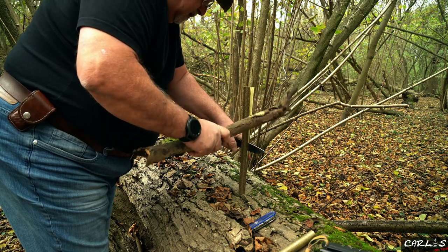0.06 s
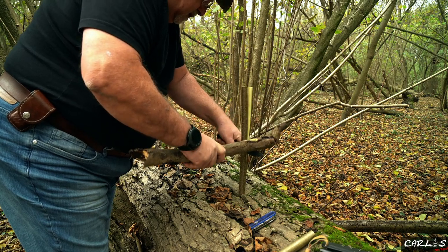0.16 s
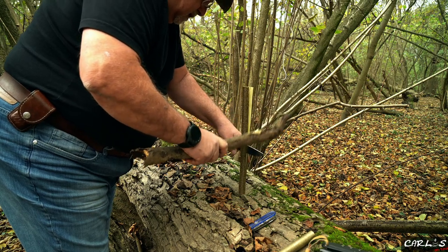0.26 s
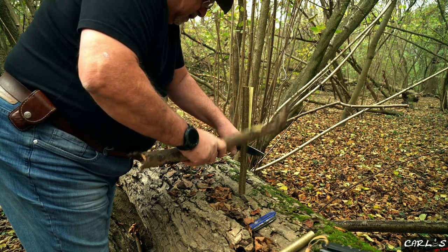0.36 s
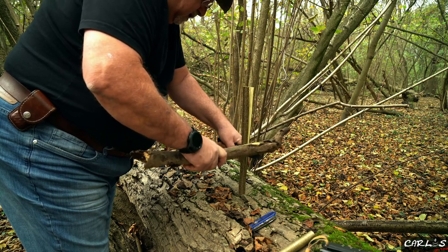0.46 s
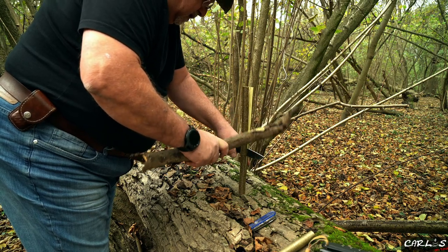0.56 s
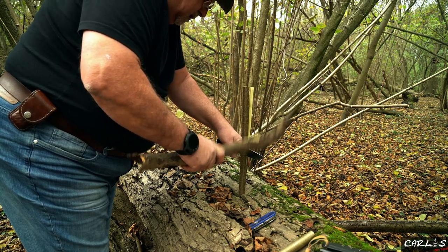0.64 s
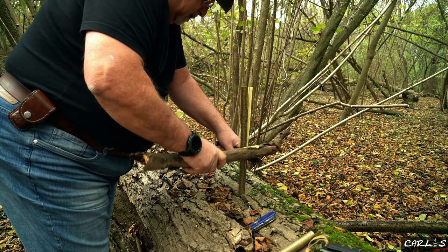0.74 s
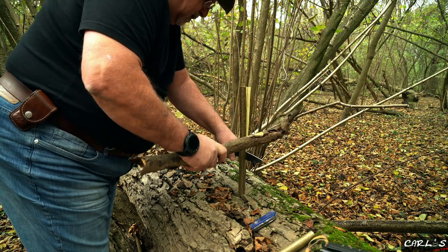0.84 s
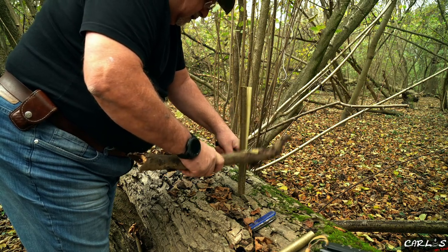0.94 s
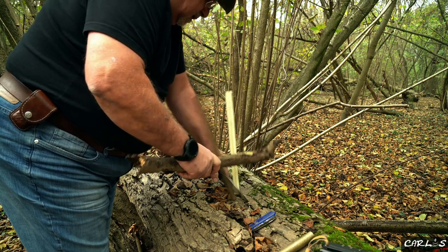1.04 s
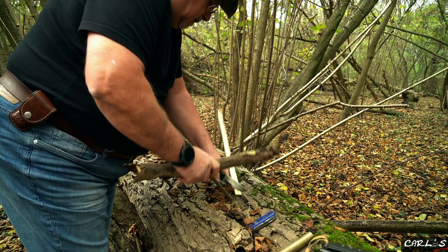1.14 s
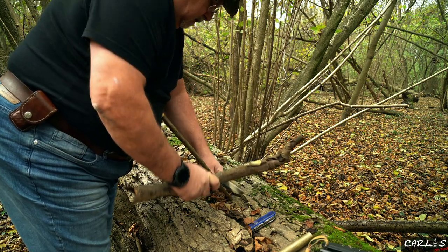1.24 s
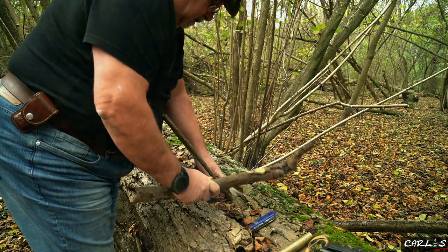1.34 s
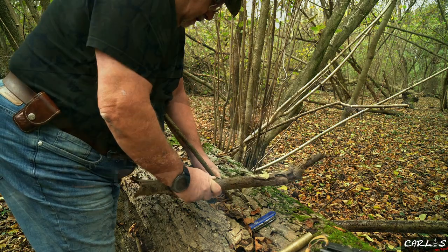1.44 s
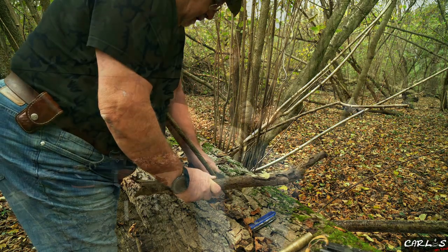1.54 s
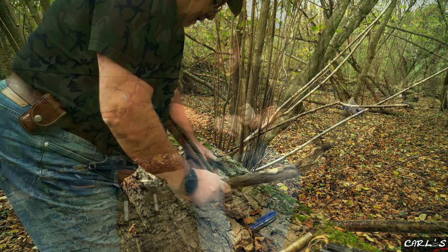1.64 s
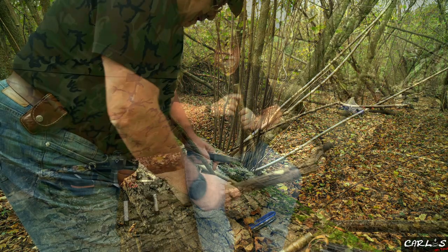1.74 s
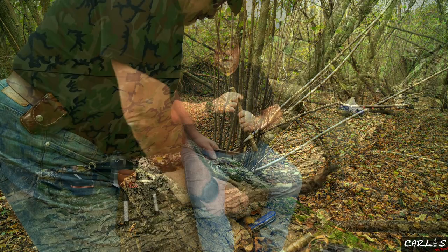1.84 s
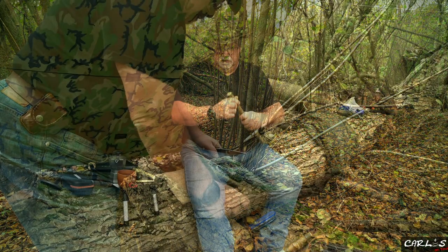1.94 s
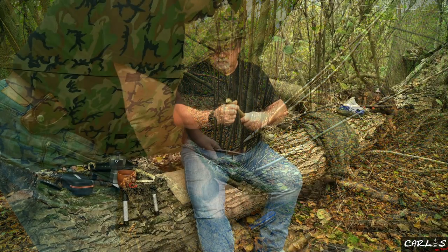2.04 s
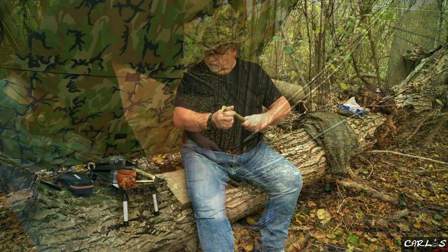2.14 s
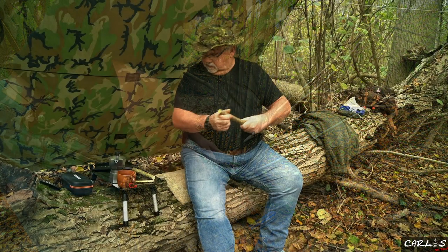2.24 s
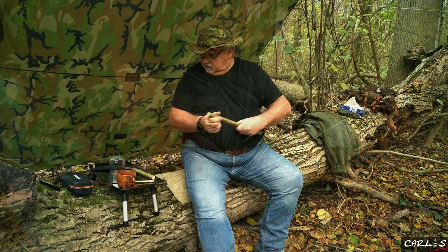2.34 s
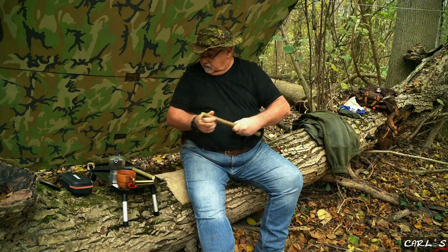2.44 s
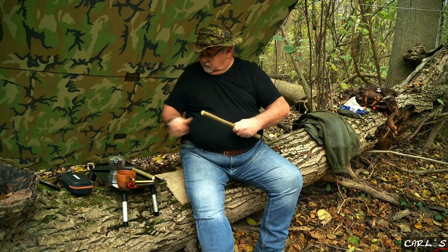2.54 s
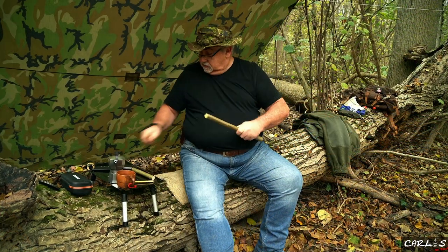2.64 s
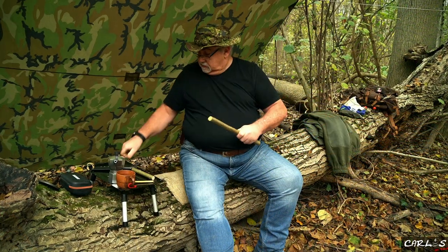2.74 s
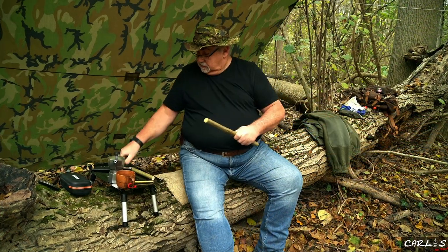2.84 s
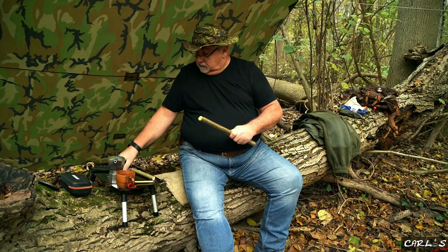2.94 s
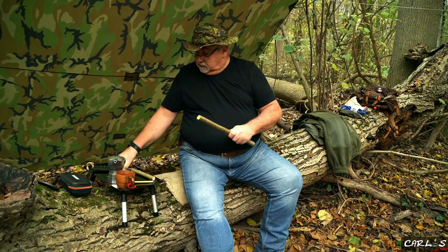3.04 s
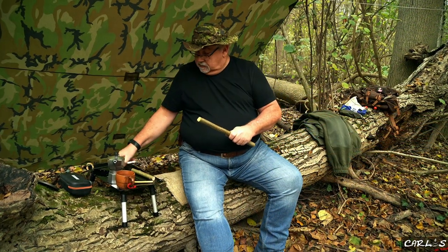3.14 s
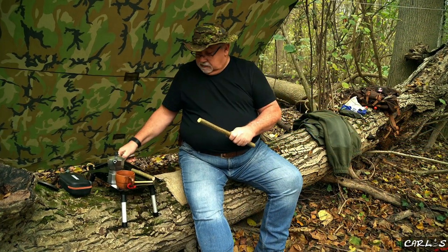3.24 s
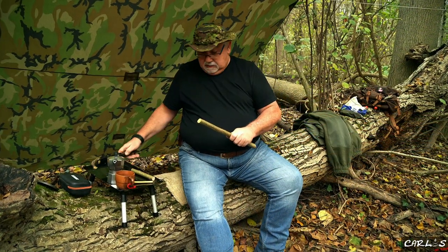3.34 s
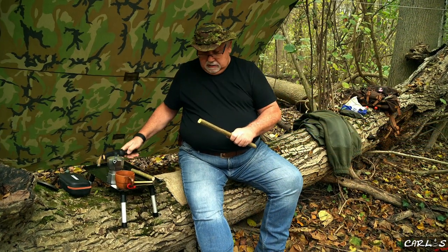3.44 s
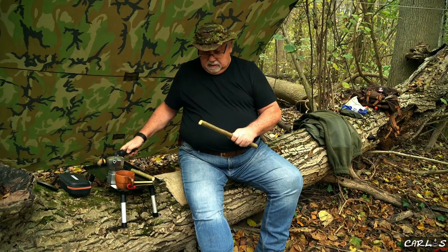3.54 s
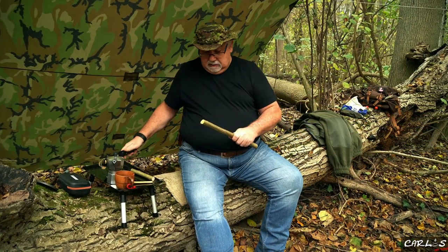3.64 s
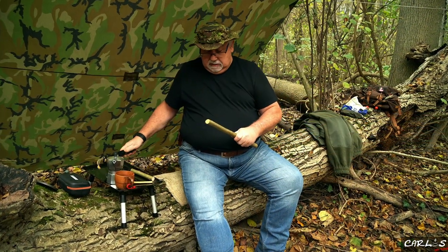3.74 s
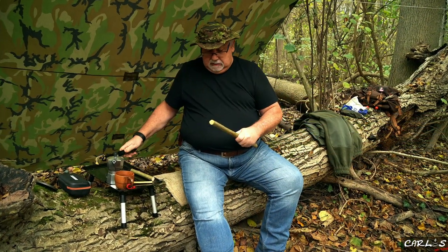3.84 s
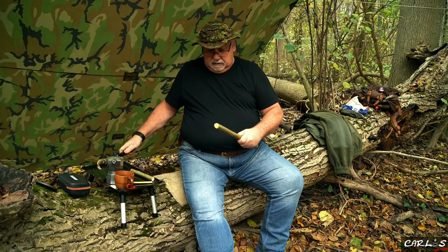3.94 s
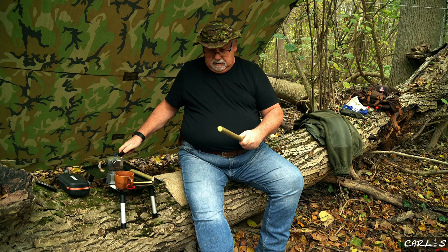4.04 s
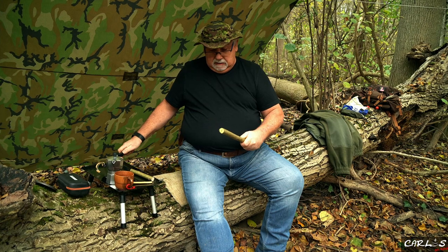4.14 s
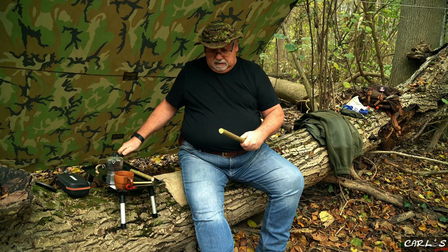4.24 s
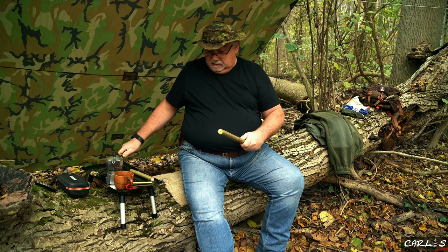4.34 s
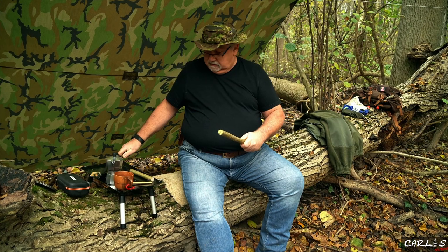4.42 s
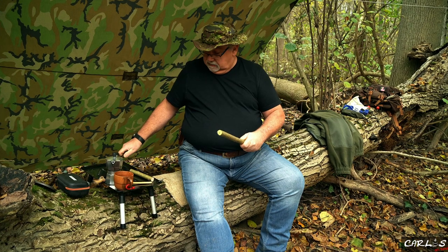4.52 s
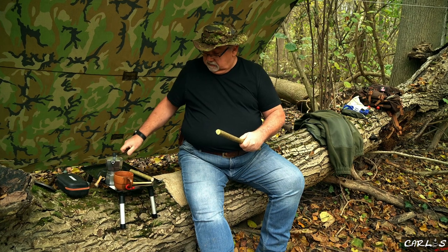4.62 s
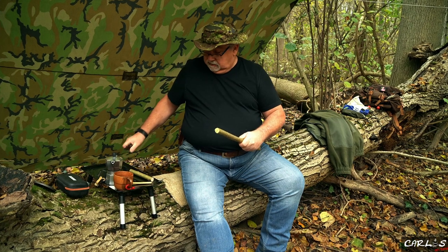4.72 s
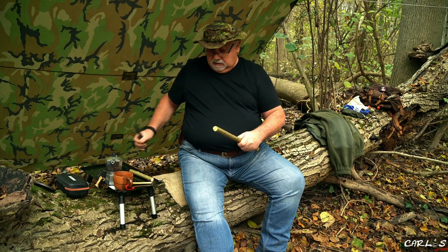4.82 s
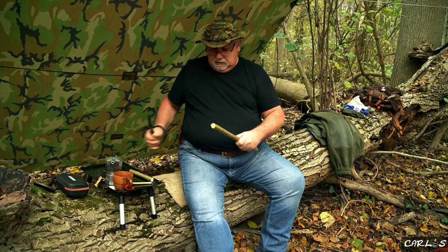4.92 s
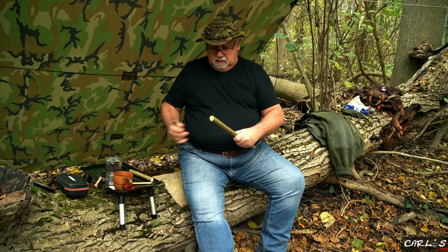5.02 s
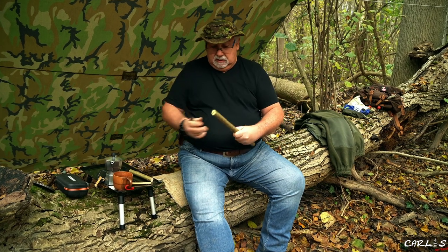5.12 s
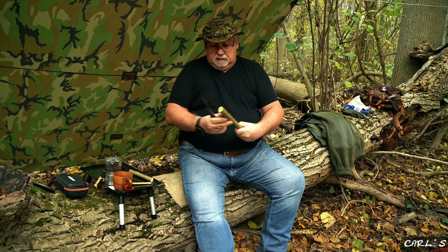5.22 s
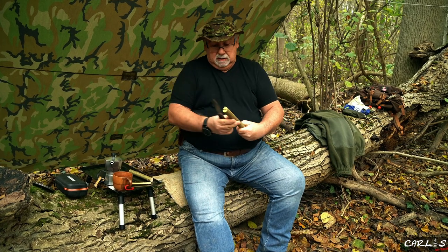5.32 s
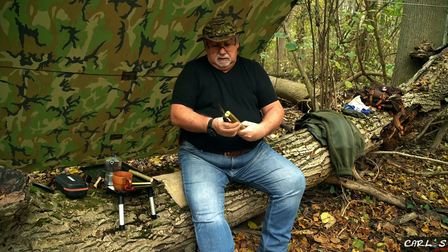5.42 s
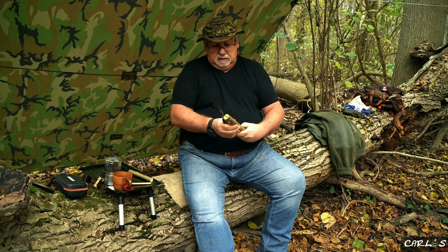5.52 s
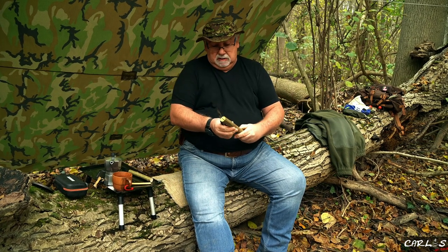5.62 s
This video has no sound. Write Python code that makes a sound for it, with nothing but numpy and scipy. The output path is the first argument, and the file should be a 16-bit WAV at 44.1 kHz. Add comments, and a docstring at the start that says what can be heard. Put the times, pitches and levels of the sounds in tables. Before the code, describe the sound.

A stick hammers a blade through a pole until it tears apart; after a hush, small hard gear is handled and rattled outdoors.

```python
"""Splitting a thin pole with a blade

A stick hammers a blade down a pole in a quiet wood: dull air-swing knocks, then cracks of noisy slips.
Resonant groans tear it open; its halves ring on a log as sums of dying sines. Filtered grit makes hands
and cloth rustle and gear clatter on the log; ticks, a far bird and hushed air join in. Loud peaks clip."""
import sys
import numpy as np
from scipy import signal
from scipy.io import wavfile
from scipy.ndimage import uniform_filter1d

SR = 44100
rng = np.random.default_rng(int(sys.argv[2]) if len(sys.argv) > 2 else 0)


def gain_from_db(level_db):
    """Turn a decibel level (scalar or array-like) into a linear amplitude factor."""
    decades = np.asarray(level_db, float) / 20
    return 10 ** decades


def unload_wav(signal):
    """Save mono or channel-first audio to the path in sys.argv[1] as 16-bit WAV at rate SR, clipped to [-1, 1]."""
    wavfile.write(
        sys.argv[1],
        SR,
        np.round(np.clip(np.atleast_2d(signal).T, -1, 1) * 32767).astype(np.int16),
    )


N = 250039
LEAD = SR // 5  # samples ahead of 0 s, for a crack that starts there

# spectrum of snapping fibres and bark dust: hz, level_db
FIBRE_SPECTRUM = [(880, -52), (1500, -20), (2590, -10.5), (5120, -5.5), (5880, -10.5), (6830, -6.5),
                  (8660, -6), (10300, -14), (12600, -11), (16000, -10)]


def evened(x):
    """Scales to rms 1."""
    return x / np.sqrt(np.mean(x ** 2) + 1e-20)


def peaked(x):
    """Scales to peak 1."""
    return x / (abs(x).max() + 1e-20)


def read(points, hz):
    """Reads a spectrum on a log-frequency axis."""
    f, value = np.transpose(points)
    return np.interp(np.log(hz + 1), np.log(f + 1), value)


def blank():
    """Empty track with the lead."""
    return np.zeros(N + LEAD)


def seconds(count):
    """Time axis of count samples."""
    return np.arange(count) / SR


def add(mix, s, sound):
    """Mixes a sound in at s seconds."""
    part = mix[LEAD + round(s * SR):][:len(sound)]
    part += sound[:len(part)]


def colour(x, points, tilt_db=0., pivot_hz=3000, lifts=()):
    """Minimum-phase filter: spectrum, tilt per octave and resonance lifts (hz, width_hz, lift_db)."""
    hz = abs(np.fft.fftfreq(4096, 1 / SR))
    db = read(points, hz) + tilt_db * np.log2((hz + 50) / pivot_hz)
    db = db + sum(lift / (1 + (2 * (hz - f) / w) ** 2) for f, w, lift in lifts)
    log_gain = np.log(gain_from_db(np.maximum(db, -100)))
    impulse = np.fft.ifft(np.exp(np.conj(signal.hilbert(log_gain)))).real[:2048]
    return signal.oaconvolve(x, impulse)[:len(x)]


def resonances(x, bands):
    """Sum of resonant filters (hz, width_hz, level_db)."""
    return sum(gain_from_db(db) * signal.lfilter(*signal.iirpeak(hz, hz / w, SR), x) for hz, w, db in bands)


def modes(table, t):
    """Sum of dying sines (hz, level_db, t60_s)."""
    return sum(gain_from_db(db - 60 * t / t60) * np.sin(2 * np.pi * hz * t) for hz, db, t60 in table)


def grit(shape, spread_db):
    """Noise whose samples differ widely in size, as many small slips do."""
    return rng.standard_normal(shape) * gain_from_db(spread_db * np.minimum(rng.exponential(1, shape), 4))


def clumps(shape, depth_db, width):
    """Random gain that wanders over width samples."""
    return gain_from_db(depth_db * evened(uniform_filter1d(rng.standard_normal(shape), width)))


def burst(t, rise, hold, t60):
    """Rises, holds, then dies away."""
    fall = gain_from_db(-60 * np.maximum(t - rise - hold, 0) / max(t60, 1e-3))
    return np.minimum(t / max(rise, 1e-5), 1) * fall


def level(rows):
    """Gain along a level curve, -120 dB outside it."""
    s, db = np.transpose(rows)
    return gain_from_db(np.interp((np.arange(N + LEAD) - LEAD) / SR, s, db, left=-120, right=-120))


def strays(per_s):
    """Random moments at a mean rate, each with two numbers between -1 and 1."""
    rows = rng.random((60, 3))
    s = np.cumsum(-np.log(1 - rows[:, 0]) / per_s)
    return [(a, 2 * b - 1, 2 * c - 1) for a, (_, b, c) in zip(s, rows) if a < N / SR]


def air():
    """Far hush of the wood over a low rumble lifted by a far drone, drifting in patches."""
    # hush spectrum: hz, level_db
    hush = [(12, -32), (20, -5), (74, -3), (177, -16.5), (319, -14.5), (388, -18), (976, -18.5),
            (2080, -25.5), (7520, -33.5), (13900, -45), (16000, -44)]
    level_db = -48.5
    drone_hz, drone_width_hz, drone_lift_db = 53, 17, 3
    frames, hz = N // 1024 + 5, np.fft.rfftfreq(4096, 1 / SR)
    real, imaginary, patches = rng.standard_normal((frames, 2049, 3)).T
    patches = evened(uniform_filter1d(uniform_filter1d(patches, 40, 0), 8, 1))
    hush_db = read(hush, hz) + drone_lift_db / (1 + (2 * (hz - drone_hz) / drone_width_hz) ** 2)
    z = (real + 1j * imaginary) * gain_from_db(hush_db[:, None] + 0.43 * patches)
    return gain_from_db(level_db) * evened(signal.istft(z, nperseg=4096, noverlap=3072)[1][:N])


def cracks():
    """Each snap is a spray of slips; the trees scatter hiss back and the gripped blade rings a little."""
    # snapping fibres: start_s, level_db, hold_s, tilt_db_per_octave
    snaps = [(-.085, -1, 0.0033, 1.5), (0.1816, -0.5, 0.0051, -0.5), (0.445, 2.5, 0.0045, 0.5),
             (0.7117, 2.5, 0.0044, 1), (.969, 3.5, 0.0039, 5), (1.016, -15.5, 0.016, 0),
             (1.0297, -5.5, 0.0032, -2), (1.0563, -17, 0.0052, 0), (1.109, -25.5, 0.0023, -2),
             (1.151, -28, 0.0021, 5.5), (1.162, -28, 0.011, -3.5), (1.338, -22, 0.014, -7)]
    # two fuzzy blade rings, one row per depth in the wood: low_hz, high_hz
    blade_hz = [(5100, 7700), (7000, 8500), (6600, 7400)]
    # moments after which the blade sits deeper: s
    deeper_s = [.4, .65]
    blade_db, blade_t60_s, blade_filter_width_hz = -43, .5, 950
    flash_db, flash_t60_s, flash_band = -10, 0.00852, (14900, 2100, 0)
    trees_db, trees_tilt_db, trees_t60_s = -28.5, 0, .26
    top_hz, top_t60_s = 9200, .14  # leaves swallow the top treble sooner
    mix, t = blank(), seconds(SR // 2)
    shape = len(snaps), len(t)
    sprays, tails = grit(shape, 1.2), grit(shape, 2.)
    tails = tails * clumps(shape, 1.5, 150)  # trunks stand unevenly
    for (s, db, hold, tilt_db), spray, tail in zip(snaps, sprays, tails):
        ring_hz = blade_hz[np.searchsorted(deeper_s, s)]
        bands = [(hz, blade_filter_width_hz, 0) for hz in ring_hz]
        lifts = [(hz, .5 * blade_filter_width_hz, 6.5) for hz in ring_hz]
        t60 = 0.0036 * gain_from_db(-1.1 * db)  # weak snaps die more slowly
        snap = peaked(colour(spray * burst(t, .0001, hold, t60), FIBRE_SPECTRUM, tilt_db, 6000, lifts))
        # very bright first instant
        flash = peaked(resonances(spray * burst(t, .0001, 0.00036, flash_t60_s), [flash_band]))
        hiss = evened(colour(tail, FIBRE_SPECTRUM, trees_tilt_db, 6000, lifts))
        top = signal.lfilter(*signal.butter(3, top_hz, "high", fs=SR), hiss)
        scatter = (hiss - top) * burst(t, 0.0024, 0.001, trees_t60_s)
        scatter = scatter + top * burst(t, 0.0021, .0007, top_t60_s)
        blade = evened(resonances(resonances(tail, bands), bands))
        blade = blade * burst(t, 0.0017, 0.0016, blade_t60_s)
        sound = snap + gain_from_db(flash_db + tilt_db) * flash
        sound = sound + gain_from_db(trees_db) * scatter + gain_from_db(blade_db) * blade
        add(mix, s, gain_from_db(db) * sound)
    return mix


def bird():
    """Far, short whistles that arch up and down, with an octave partial."""
    # chirps: start_s, length_s, level_db, top_hz of the lower partial
    chirps = [(.121, .03, -60, 2480), (.643, .027, -64, 2480)]
    arch_share, octave_db = .22, 1.5  # share by which the ends are lower; upper partial
    mix = blank()
    for s, length, db, hz in chirps:
        arch = np.sin(np.pi * np.arange(0, length, 1 / SR) / length)
        phase = 2 * np.pi * np.cumsum(hz * (1 - arch_share * (1 - arch))) / SR
        whistle = np.sin(phase) + gain_from_db(octave_db) * np.sin(2 * phase)
        add(mix, s, gain_from_db(db) * evened(np.sqrt(arch) * whistle))
    return mix


def ticks():
    """Tiny dry ticks: a noise click excites one brief, broad resonance."""
    # placed ticks: start_s, peak_db, ring_hz
    placed = [(.1445, -37, 8960), (1.775, -42.5, 12030), (2.365, -40, 13500), (1.985, -36, 6200),
              (2.112, -21, 7700), (2.463, -21.5, 7640), (2.475, -24, 7500), (4.013, -39.5, 7900)]
    stray_per_s, stray_db, stray_hz = 0.5, -58, 10200  # mean values
    mix, t = blank(), seconds(600)
    clicks = placed + [(s, stray_db + 5 * a, stray_hz * (1 + 0.31 * b)) for s, a, b in strays(stray_per_s)]
    for (s, db, hz), puff in zip(clicks, rng.standard_normal((80, len(t)))):
        ring = resonances(puff * burst(t, .0002, .0008, .012), [(hz, .3 * hz, 0)])
        add(mix, s, gain_from_db(db) * peaked(ring))
    return mix


def knocks():
    """A soft contact gives one and a half swings of air; the log rings low and the ground echoes."""
    # knocks of wood on wood: start_s, level_db, pitch_hz
    blows = [(0.1702, 0, 950), (0.435, 2.5, 1022), (0.7004, 1.5, 996), (0.9574, -1.5, 920),
             (1.059, -21, 540), (1.072, -23.5, 445), (1.1066, -13.5, 676), (1.1471, -14.5, 1060),
             (1.2, -32.5, 450), (1.2537, 3.5, 1150), (1.368, -8, 840)]
    # log modes before random detuning: hz, level_db, t60_s
    log_modes = [(410, 9, 0.025), (716, 1, 0.064), (1070, 2, 0.031), (257, -13.5, 0.22)]
    puff_db, echo_s, echo_db = -12, .0034, -22
    ring_s, ring_db, ring_db_per_db = 0.0013, -9, 0.5  # the ring grows more slowly than the knock
    mix, t = blank(), seconds(3000)
    detunings = rng.uniform(.9, 1.1, (len(blows), len(log_modes)))  # no two blows land alike
    for (s, db, hz), dust, detuning in zip(blows, grit((len(blows), len(t)), 2.), detunings):
        turns = hz * t
        swing = peaked(np.exp(-((turns - 1.07) / .6) ** 2) * np.sin(2 * np.pi * turns))
        # bark dust hisses with the blow
        puff = peaked(colour(dust * burst(t, 0.00028, 0.0046, 0.011), FIBRE_SPECTRUM, -12.0, 6000))
        detuned = [(f * k, lift, t60) for (f, lift, t60), k in zip(log_modes, detuning)]
        add(mix, s, gain_from_db(db) * (swing + gain_from_db(puff_db) * puff))
        add(mix, s + echo_s, gain_from_db(db + echo_db) * swing)
        add(mix, s + ring_s, gain_from_db(ring_db + ring_db_per_db * db) * peaked(modes(detuned, t)))
    return signal.lfilter(*signal.butter(1, 220, "high", fs=SR), mix)  # thin wood sends out little bass


def rustle():
    """Hands, cloth and leaves brush: fine grit in clumps, swelling and fading with each movement."""
    # strokes: start_s, end_s, level_db
    placed = [(1.379, 1.455, -40.5), (1.426, 1.523, -46), (1.491, 1.58, -41.5), (1.874, 1.993, -46),
              (2.012, 2.123, -47), (2.077, 2.179, -40), (2.226, 2.356, -45.5), (2.455, 2.51, -51),
              (3.43, 3.48, -56), (3.8, 3.835, -55.5), (4.82, 4.9, -57), (5.24, 5.41, -52), (5.52, 5.6, -54),
              (5.62, 5.69, -50)]
    # brushing spectrum: hz, level_db
    brush = [(240, -12.5), (400, -22), (616, -50), (814, 0), (2180, 1), (8240, 3), (10200, -8), (11900, -2),
             (16000, -6)]
    fidgets_per_s, fidget_s, fidget_db = 3.5, 0.029, -60  # small shifts of cloth, mean values
    fidgets = [(s, s + fidget_s * (1 + .5 * a), fidget_db + 4 * b) for s, a, b in strays(fidgets_per_s)]
    mix, shape = blank(), (80, SR // 4)
    fine = grit(shape, 4.) * clumps(shape, 1.8, 300)
    for (start, end, db), slips in zip(placed + fidgets, fine):
        tilt_db = -0.5 - 0.04 * (db + 51)  # per octave; lighter strokes are thinner
        stroke = evened(colour(slips, brush, tilt_db, 6000))[:round((end - start) * SR)]
        add(mix, start, gain_from_db(db) * stroke * signal.windows.tukey(len(stroke), .75))
    return mix


def tear():
    """Clumped, uneven slips excite the split wood; narrow groans stop as the halves part and tumble."""
    # groan, then tumbling: time_s, level_db
    curve = [(.968, -29), (.974, -20), (.994, -21), (1.001, -16), (1.009, -30.5), (1.075, -33), (1.09, -51),
             (1.115, -36), (1.2, -53), (1.26, -37), (1.49, -57)]
    # split wood: hz, filter_width_hz, level_db, stifled_s
    groans = [(1286, 103, -4.5, 1.003), (1532, 108, -3.5, 1.001), (2452, 230, -8.5, 0.93),
              (3455, 130, -10, 1.045), (530, 1900, -2, 3.1)]
    slips = grit(N + LEAD, 2.4) * clumps(N + LEAD, 2.2, 150)
    t = (np.arange(N + LEAD) - LEAD) / SR
    body = blank()
    for hz, width_hz, db, end in groans:
        band = [(hz, width_hz, 0)]
        groan = evened(resonances(resonances(slips, band), band))
        body += gain_from_db(db) * groan * np.clip((end - t) / 0.0063, 0, 1)
    return level(curve) * body


def taps():
    """The contact point and hardness choose which modes of the loose half pole sound."""
    # taps: start_s, peak_db, centre_hz, spread_octaves
    contacts = [(1.0267, -15.5, 1700, 0.42), (1.057, -19, 3700, 0.52), (1.214, -33, 4300, 0.27),
                (1.231, -18, 2020, 0.77), (1.2542, -7.5, 1810, 1.425), (1.317, -20.5, 4020, 0.28),
                (1.3653, -15, 1316, 0.58)]
    # pole modes: hz, level_db, t60_s
    pole = [(296, 18.5, 0.5), (535, 20, 0.089), (835, 2, 0.32), (1364, -2.5, 0.3), (1700, 11.5, 0.068),
            (2410, -1, 0.14), (2730, 11.5, 0.1), (3407, 14, 0.058), (4700, 11, 0.02)]
    mix, t = blank(), seconds(SR // 2)
    for s, db, centre_hz, spread in contacts:
        table = [(hz, lift - 5.3 * (np.log2(hz / centre_hz) / spread) ** 2, t60) for hz, lift, t60 in pole]
        add(mix, s, gain_from_db(db) * peaked(modes(table, t)))
    return mix


def clatter():
    """Gritty contacts ring hollow gear, held anew each time; the treble dies sooner than the body."""
    # gear put down and dragged: start_s, level_db, hold_s, tilt_db_per_octave, struck_spot_hz
    hits = [(2.9466, -22, 0.021, -6, 600), (2.987, -24, 0.01, -4, 503), (3.0264, -12, 0.012, -4, 1300),
            (3.106, -11.5, 0.00093, 2, 1330), (3.153, -33, 0.0067, 0, 2320), (3.206, -22, 0.00087, 4, 3330),
            (4.263, -33.5, 0.0041, 2, 1070), (4.303, -22.5, 0.0054, 1, 1070),
            (4.3125, -9.5, 0.0021, 2, 1010), (4.348, -20.5, 0.012, -0.5, 910),
            (4.365, -1.5, 0.0055, 2, 3600), (4.385, -9, .002, 3, 3660), (4.39, 0, 0.0042, 0, 1290),
            (4.4583, -7, 0.011, 0.5, 1190), (4.4916, -5.5, 0.0053, -1, 4760), (4.51, -1, 0.0069, 0.5, 2390),
            (4.5342, -2, 0.0036, 0, 4000), (4.5795, -12, 0.0086, -1, 1910), (4.588, -8, 0.013, -0.5, 800),
            (4.603, -8, 0.011, -1.5, 1960), (4.764, -23.5, 0.016, -4, 950)]
    # gear spectrum: hz, level_db
    gear = [(71, 6), (120, -21), (204, -9), (463, -9.5), (757, 3), (1650, -0.5), (4140, -2.5),
            (6110, -11.5), (7350, -5), (13600, -30.5), (16000, -31)]
    # gear resonances before random detuning: hz, width_hz, lift_db
    gear_modes = [(181, 44, 6.5), (680, 200, 1), (1037, 7.8, 5.5), (2310, 40, 8), (3500, 530, 1.5),
                  (7500, 410, -7.5), (12900, 1700, 16)]
    spot_q, spot_lift_db = 6., 6.5  # the struck place rings above the rest
    mix, t = blank(), seconds(SR // 5)
    shape = len(hits), len(t)
    contacts = grit(shape, 2.2) * clumps(shape, 1.8, 60)
    detunings = rng.uniform(.93, 1.07, (len(hits), len(gear_modes)))
    for (s, db, hold, tilt_db, spot_hz), slips, detuning in zip(hits, contacts, detunings):
        rise = .08 * hold
        t60 = .105 * gain_from_db(0.2 * db - 0.8 * tilt_db)  # loud and dull contacts ring longest
        dull = signal.lfilter([.3], [1, -.7], slips)
        drive = dull * burst(t, rise, hold, t60) + (slips - dull) * burst(t, rise, hold, 0.17 * t60)
        lifts = [(hz * k, w, lift) for (hz, w, lift), k in zip(gear_modes, detuning)]
        lifts.append((spot_hz, spot_hz / spot_q, spot_lift_db))
        add(mix, s, gain_from_db(db) * peaked(colour(drive, gear, tilt_db, 2000, lifts)))
    return signal.lfilter(*signal.butter(3, 175, "high", fs=SR), mix)  # small things send out no deep bass


def clasp():
    """A hard clasp chatters: very short contacts ring its modes."""
    # contacts: start_s, peak_db
    chatter = [(3.1062, -24), (3.1078, 0), (3.1111, -4), (3.1155, -16)]
    # clasp modes: hz, level_db, t60_s
    clasp_modes = [(1150, -16, 0.039), (1780, -21, 0.034), (2240, 11.5, 0.0088), (2880, 0, 0.055),
                   (3700, 19.5, 0.0033), (8270, -4, 0.017), (12900, -15, 0.002)]
    mix, t = blank(), seconds(1500)
    click = peaked(modes(clasp_modes, t) * np.minimum(t / .00012, 1))
    for s, db in chatter:
        add(mix, s, gain_from_db(db) * click)
    return mix


def thin():
    """Narrow partials of the gear, wavering by a random walk of phase, sound along with the hits."""
    # thin rings: start_s, hz, level_db, t60_s
    rings = [(4.3105, 1070, -19, .045), (4.334, 3700, -40, .12), (4.606, 2480, -57, 1.)]
    mix, t = blank(), seconds(SR // 2)
    for (s, hz, db, t60), noise in zip(rings, rng.standard_normal((len(rings), len(t)))):
        waver = np.cumsum(noise) * .05
        add(mix, s, np.sin(2 * np.pi * hz * t + waver) * gain_from_db(db) * burst(t, .003, 0, t60))
    return mix


def scene():
    """All sources at one microphone."""
    mix = cracks() + bird() + ticks() + knocks() + rustle()
    mix = mix + tear() + taps() + clatter() + clasp() + thin()
    return (mix[LEAD:] + air())[None]


def band_limit(x):
    """A steep low-pass at the top of the band."""
    return signal.sosfilt(signal.butter(12, 16430, fs=SR, output="sos"), x)


def record(dry):
    """The converter clips the loudest peaks; a low-pass then limits the band."""
    lowpass = signal.firwin(127, 16150, window=("kaiser", 7), fs=SR)[None]
    limited = signal.oaconvolve(np.clip(dry, -1, 1), lowpass, "same")
    return band_limit(limited)


dry = scene()
out = record(dry)
unload_wav(out)
```